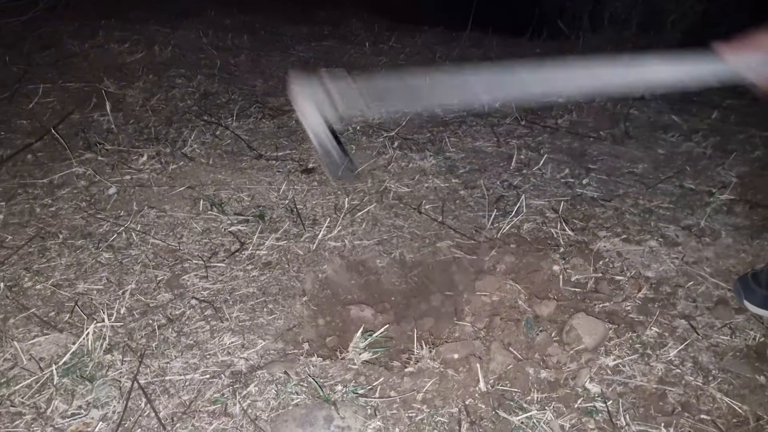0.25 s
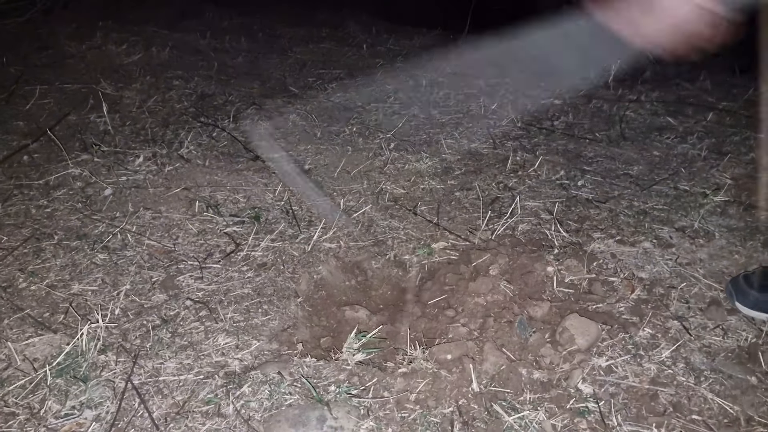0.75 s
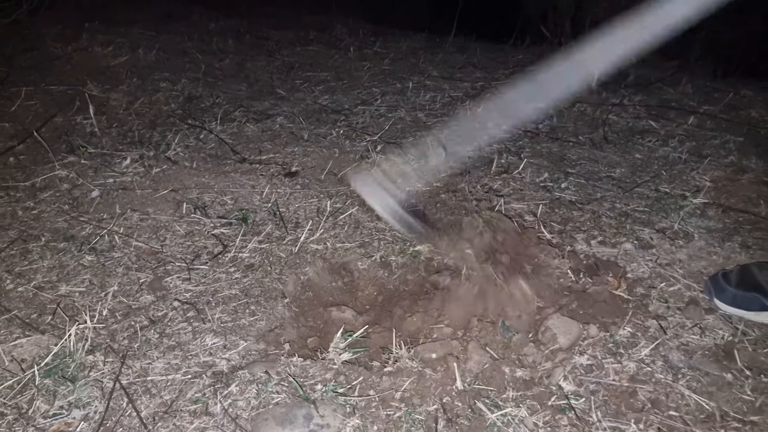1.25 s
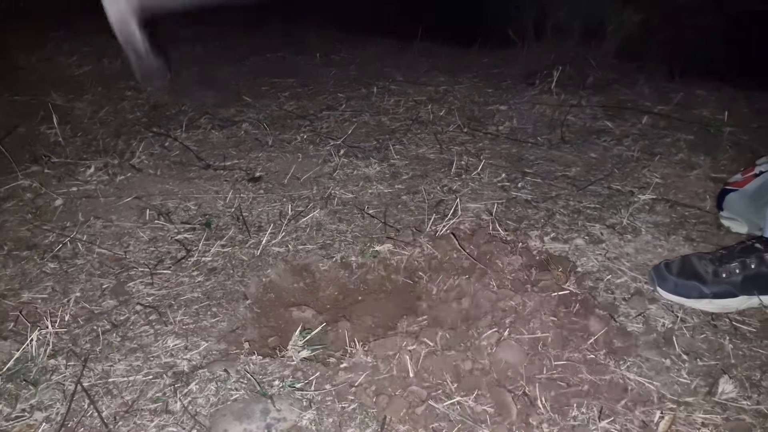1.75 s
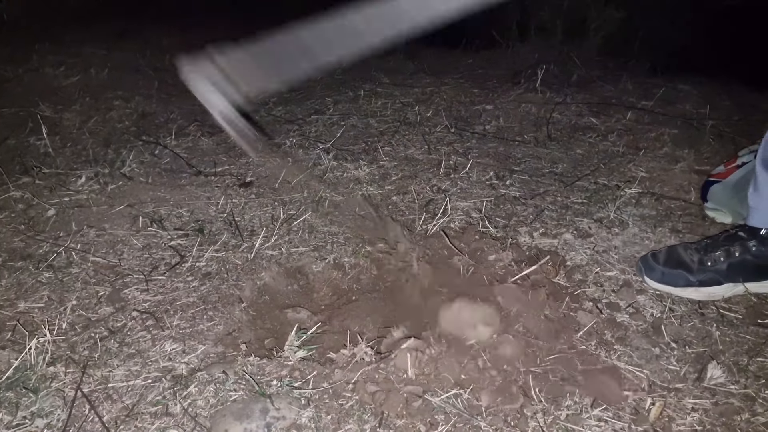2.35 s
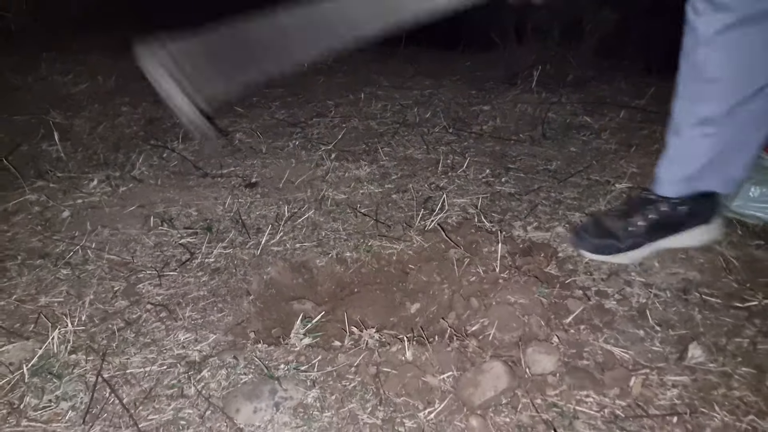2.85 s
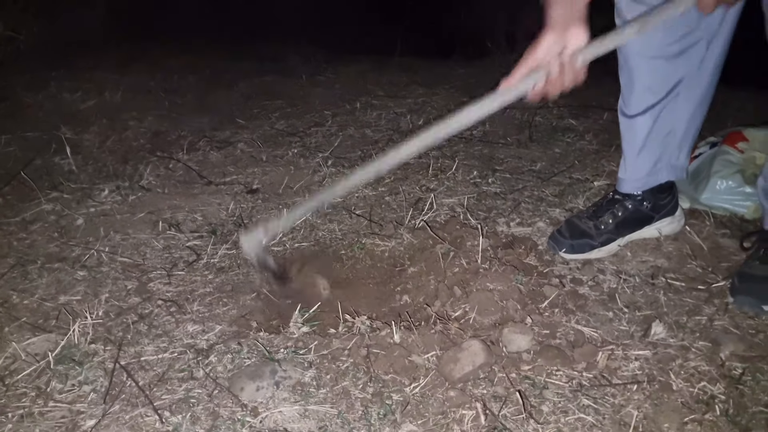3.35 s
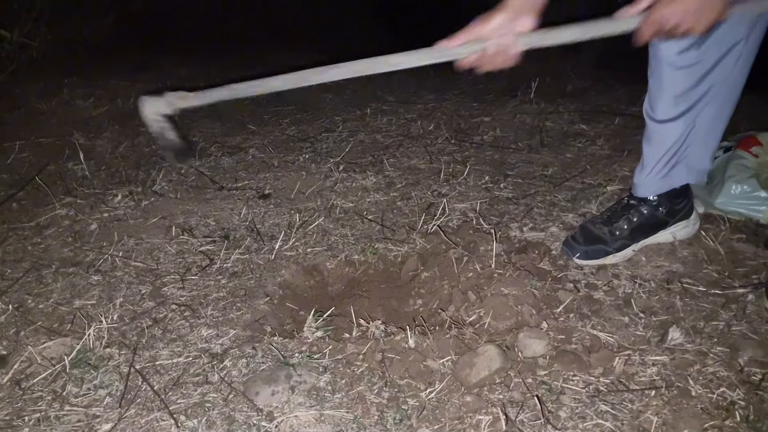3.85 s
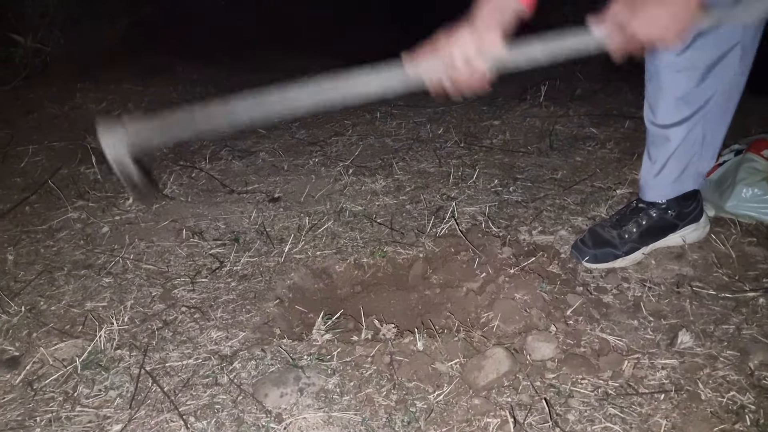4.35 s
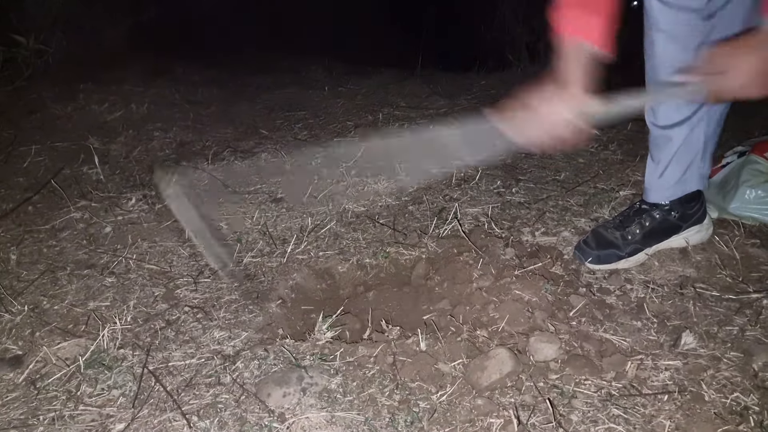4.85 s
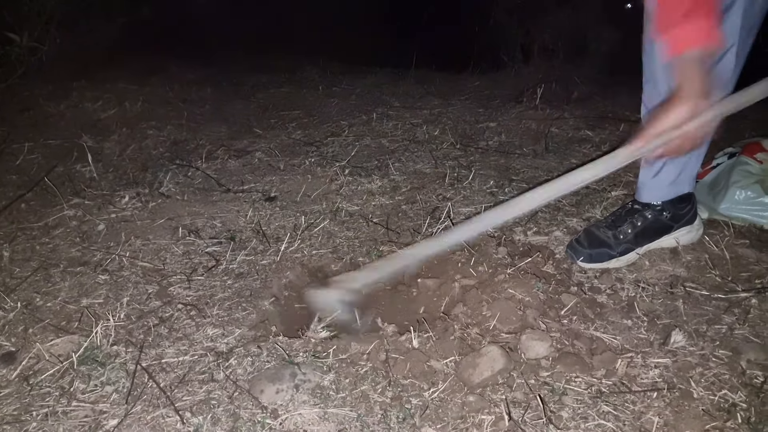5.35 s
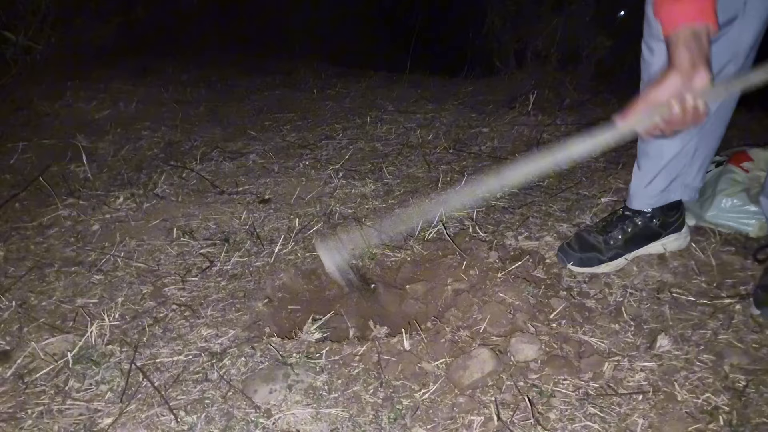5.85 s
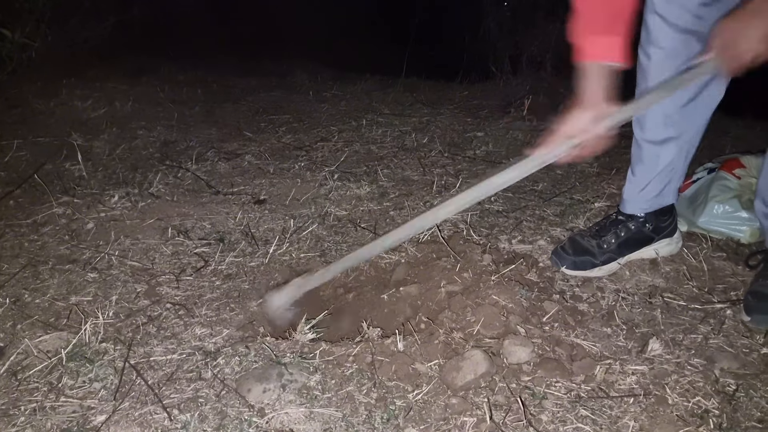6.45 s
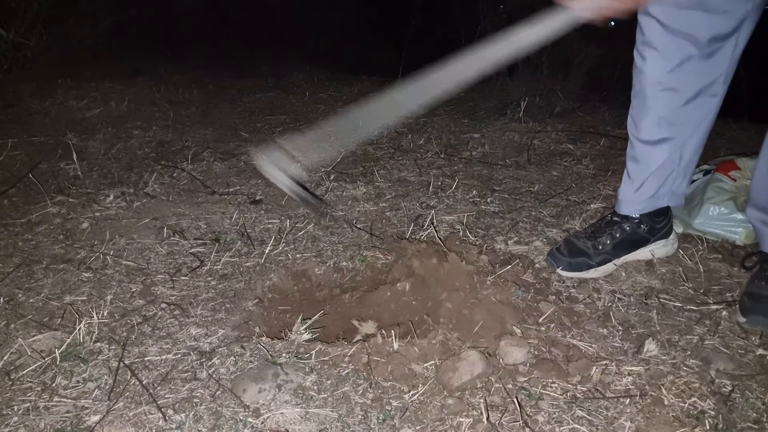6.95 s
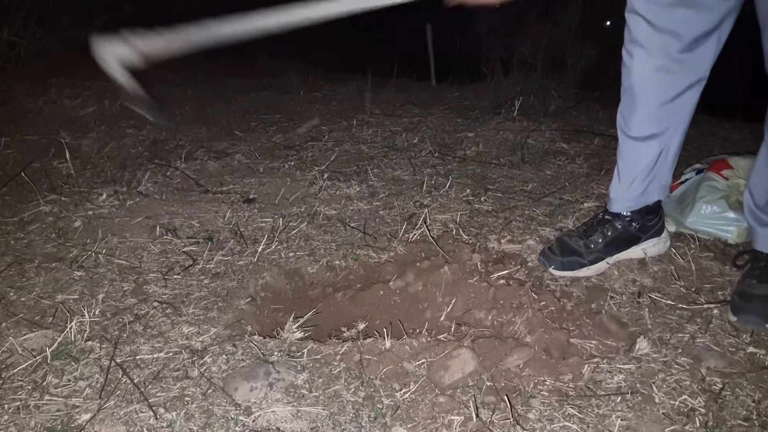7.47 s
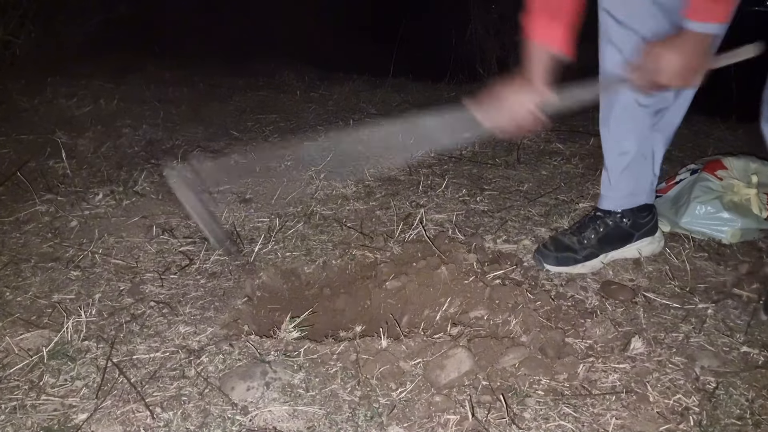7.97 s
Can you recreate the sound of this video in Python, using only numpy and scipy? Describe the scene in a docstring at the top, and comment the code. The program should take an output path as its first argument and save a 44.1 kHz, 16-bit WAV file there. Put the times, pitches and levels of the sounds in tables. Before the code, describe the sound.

Outdoors on open ground at night, close stereo pickup of rapid digging. Early strokes are bright and gritty, with dust hissing down; around three to four seconds the bites are lighter and more metallic, then become firmer, with sharp knocks and scraping pulls. Small shoe scuffs and loose soil fill the gaps. Low wind buffets come and go, with barely audible distant tones and a cricket.

```python
"""A steel hoe chops hard dry ground at night, nearly three strokes a second; light wind rumbles behind.
Each stroke is a swell of breaking grains exciting ground, hollow, blade and grit; drags and knocks follow.
Soil spills, shoes scuff and crumbs tick as filtered grain bursts; dust hisses as swelling noise.
Wind and night air are coloured noise; a far cricket and faint far tones are blurred into narrow bands."""
import sys
import numpy as np
from scipy import signal
from scipy.fft import rfft, irfft
from scipy.io import wavfile
from scipy.ndimage import uniform_filter1d

SR = 44100
rng = np.random.default_rng(int(sys.argv[2]) if len(sys.argv) > 2 else 0)


def log_audio(samples):
    """Write samples as a 16-bit WAV file to the path given in sys.argv[1]."""
    # one column per channel
    frames = np.atleast_2d(samples).T
    # limit to full scale, then quantise
    limited = np.clip(frames, -1, 1)
    pcm = np.round(limited * 32767).astype(np.int16)
    wavfile.write(sys.argv[1], SR, pcm)


N = 362061
SIZE = 16384  # samples per event
T = (np.arange(SIZE) - SIZE // 2) / SR  # time around one event [s]

# blade entering the soil: (peak time [s], packed earth [dB], hollow of the hole [dB], blade ring [dB],
# grit [dB], crumbling tail [dB], thrown dust [dB], left minus right [dB])
CHOPS = [(.139, -30, -50, -28.5, -25.5, -14, -75, -1), (.476, -39, -37.5, -30.5, -27, -8.5, -68.5, -1),
         (.818, -36, -37.5, -22, -27, -11.5, -64, -0.5), (1.175, -37.5, -34.5, -29.5, -23, -17, -69.5, 1),
         (1.518, -40, -61, -36, -32, -12.5, -59, -2), (1.871, -25, -43, -28, -26, -20.5, -82.5, 3.5),
         (2.219, -34, -29, -29, -25, -7.5, -62.5, -1.5), (2.588, -32, -56, -31, -29, -16, -64, -3),
         (2.955, -44, -61, -24.5, -51.5, -25.5, -72, -5.5), (3.344, -46, -39, -28.5, -41, -13.5, -72, -5.5),
         (3.676, -46, -43.5, -22, -25.5, -22, -87.5, 1), (4.013, -44, -38, -27.5, -26, -12, -66, -1),
         (4.481, -31.5, -30.5, -26, -28.5, -7, -79, -1.5), (4.926, -29, -30, -25.5, -26, -11, -70.5, -2.5),
         (5.361, -29, -30, -28.5, -28, -8.5, -85.5, 1.5), (5.773, -26, -27, -28.5, -38.5, -10, -94.5, -1.5),
         (6.134, -28.5, -22.5, -34, -24.5, -14.5, -95.5, -1.5),
         (6.499, -30, -33.5, -30.5, -28, -14, -92, 0), (6.824, -32, -25, -32.5, -26, -15, -76, 0),
         (7.201, -30.5, -33.5, -25.5, -25, -10.5, -66.5, -3.5), (7.648, -34, -36.5, -36, -25, -11, -75, -1),
         (8.032, -33.5, -44, -26, -28.5, -10, -74, -1.5)]


def undb(db):
    """Decibels to gain."""
    return 10 ** (np.asarray(db) / 20)


def unit(x):
    """Scale to rms 1."""
    return x / np.sqrt(np.mean(np.abs(x) ** 2) + 1e-30)


def freqs(size=SIZE):
    """Frequency axis of a spectrum [Hz], floored at 1 Hz."""
    return np.maximum(np.fft.rfftfreq(size, 1 / SR), 1)


def curve(rows, column=1):
    """One column of a time table, interpolated for every sample."""
    rows = np.array(rows)
    return np.interp(np.arange(N) / SR, rows[:, 0], rows[:, column])


def colour(points, size=SIZE):
    """Causal minimum-phase response through (frequency [Hz], level [dB]) points."""
    hz, db = np.transpose(points)
    level_db = np.interp(np.log(freqs(size)), np.log(hz), db)
    cepstrum = irfft(np.log(undb(level_db)), size)
    cepstrum[1:size // 2] *= 2
    cepstrum[size // 2 + 1:] = 0
    return np.exp(rfft(cepstrum))


def resonance(hz, width_hz, size=SIZE):
    """Response of one resonance, gain 1 at its centre."""
    f = freqs(size)
    return 1 / (1 + 1j * (f * f - hz * hz) / (f * width_hz))


def walk(step, size=N):
    """Smooth random wander that changes about every step points; spread near 1."""
    step = max(int(step), 2)
    held = np.repeat(rng.standard_normal(size // step + 1), step)
    return 1.34 * uniform_filter1d(uniform_filter1d(held, step), step)[:size]


def noise(response, likeness=0.):
    """Steady stereo noise of a given colour; likeness is the power share common to both sides."""
    left, right, common = rng.standard_normal((3, N))
    share = np.clip(likeness, 0, 1)
    stereo = np.sqrt(1 - share) * np.array([left, right]) + np.sqrt(share) * common
    return unit(irfft(rfft(stereo) * response, N))


def grains(spread_db):
    """Dense tiny fractures: mostly small, a few large."""
    size_db = spread_db * np.minimum(rng.exponential(size=SIZE), 6)
    return unit(rng.standard_normal(SIZE) * undb(size_db))


def bell(sigma_s):
    """Smooth Gaussian swell and fall around the event's time."""
    return np.exp(-.5 * (T / sigma_s) ** 2)


def fall(decay_s):
    """Sudden start and exponential fall."""
    return (T >= 0) * np.exp(-np.abs(T) / decay_s)


def ring(force, response, envelope):
    """Spectrum of a force heard through a body, scaled by the energy of the envelope."""
    return unit(rfft(force) * response) * np.sqrt(np.sum(envelope ** 2))


def add(out, s, spectrum, pan_db, scatter_rad=1.106, ripple_db=3.5, apart_hz=750):
    """Place an event; above the bass, rough ground scatters it differently to the two microphones."""
    apart = np.minimum(freqs() / apart_hz, 1)
    turn, tilt = (walk(170, size=len(apart)) for _ in range(2))
    side = np.array([[1], [-1]])
    gain = undb(side * (pan_db / 2 + ripple_db * tilt) * apart)
    gain = gain / np.sqrt(np.mean(gain ** 2, axis=0))
    phase = np.exp(1j * side * scatter_rad * turn * apart)
    sound = irfft(spectrum * gain * phase)
    start = int(s * SR) - SIZE // 2
    lo, hi = max(start, 0), min(start + SIZE, N)
    out[:, lo:hi] += sound[:, lo - start:hi - start]


def wind(trim_db=-1, buffet_db=2.5, bump_trim_db=-1):
    """Light gusts rumble at the microphone as low noise, with dull bumps from low resonances."""
    # breeze: (time [s], rumble level [dB])
    breeze = [(0, -56.5), (.33, -51), (.65, -61.5), (1.1, -43), (1.33, -58), (1.8, -62.5), (2.7, -66.5),
              (2.92, -48), (3.12, -63.5), (3.6, -62), (4.1, -46.5), (4.26, -59.5), (4.36, -39.5),
              (4.9, -45), (5.25, -54.5), (5.95, -66), (6.45, -57.5), (6.7, -61), (8.2, -71.5)]
    # rumble spectrum: (frequency [Hz], level [dB])
    rumble = [(20, -7.5), (55, 0.5), (100, 0), (160, -0.5), (210, -15.5), (300, -23), (480, -45.5),
              (1200, -66.5)]
    # dull low bumps: (time [s], level [dB], pitch [Hz])
    bumps = [(.425, -50, 140), (.661, -54.5, 158), (.882, -46, 150), (1.004, -43.5, 140),
             (1.218, -38.5, 120), (4.352, -39.5, 155), (4.572, -41.5, 130), (5.165, -46.5, 120),
             (5.435, -34.5, 129.5)]
    level_db = curve(breeze) + trim_db + buffet_db * walk(SR / 30)
    out = noise(colour(rumble, size=N), likeness=0.37) * undb(level_db)
    swell = bell(sigma_s=.009)
    for s, db, hz in bumps:
        body = resonance(hz, 94) ** 2
        add(out, s, undb(db + bump_trim_db) * ring(swell * grains(spread_db=1), body, swell), pan_db=0)
    return out


def far_tone(hz, db, blur_hz):
    """Many paths through the night air smear a distant tone into a narrow band."""
    paths = np.array([walk(SR / blur_hz) + 1j * walk(SR / blur_hz) for _ in range(2)])
    return undb(db) * np.real(paths * np.exp(2j * np.pi * np.cumsum(hz) / SR))


def still_air(level_db=-70):
    """Night air: coloured noise that wanders slowly in level."""
    # night spectrum: (frequency [Hz], level [dB])
    night_colour = [(30, 10.5), (150, 8.5), (300, 4.5), (550, 2.5), (850, -7), (1300, -5.5), (2700, -11),
                    (5000, -13.5), (7500, -21), (10000, -19), (16000, -19.5)]
    return noise(colour(night_colour, size=N), likeness=0.24) * undb(level_db + 1.0 * walk(SR / 3))


def cricket(centre_hz=2030, level_db=-79):
    """Far cricket: one continuous blurred tone, wandering in pitch and level."""
    return far_tone(centre_hz + 12 * walk(SR / 6), level_db + 1.5 * walk(SR / 5), blur_hz=137)


def far_calls(pitch_hz=562, trim_db=-1):
    """Faint far calls: Gaussian swells of one blurred note."""
    # (peak time [s], Gaussian sigma [s], level [dB])
    calls = [(5.31, 0.036, -68), (5.6, .09, -76.5), (6.27, 0.042, -68), (6.43, 0.03, -66),
             (6.64, 0.047, -66), (7.46, 0.019, -61.5)]
    t = np.arange(N) / SR
    swells = sum(undb(db) * np.exp(-.5 * ((t - s) / sigma_s) ** 2) for s, sigma_s, db in calls)
    return swells * far_tone(np.full(N, pitch_hz), trim_db, blur_hz=72.7)


def falling_tone(trim_db=-1):
    """Higher far tone: a blurred tone gliding down in pitch."""
    # (time [s], pitch [Hz], level [dB])
    glide = [(5.85, 1400, -100), (5.95, 1380, -74), (6.08, 1360, -78), (6.28, 1293, -81.5),
             (6.42, 1265, -79.5), (6.5, 1260, -100)]
    return far_tone(curve(glide), curve(glide, column=2) + trim_db, blur_hz=73.5)


def bodies(detune=0.014, thud_hz=155, hollow_hz=1750):
    """Ground, hollow and blade; the soil loads the blade a little differently on every contact."""
    # steel blade modes, damped by the soil: (frequency [Hz], width [Hz], level [dB])
    modes = [(2330, 99, -13), (4470, 170, -8), (4857, 200, 6.5), (5180, 200, -5), (6040, 170, -15.5),
             (7430, 150, -6.5), (9900, 220, -18.5), (13015, 300, -18.5), (15200, 200, -21.5)]
    shifts, loads = rng.standard_normal((2, len(modes)))
    loads_db = 3.2 * np.clip(loads, -1.5, 1.5)
    blade = sum(undb(db + load_db) * resonance(hz * (1 + detune * shift), width_hz)
                for (hz, width_hz, db), shift, load_db in zip(modes, shifts, loads_db))
    return resonance(thud_hz, 260) ** 2, resonance(hollow_hz, 690) ** 2, blade


def contact(forces, envelope, levels_db):
    """One contact of the blade: forces excite crunch, thud, hollow, blade ring and grit."""
    # packed earth spectrum: (frequency [Hz], level [dB])
    crunch_colour = [(80, -23), (300, -3), (1000, 0), (3000, -7), (6000, -16), (16000, -36.5)]
    # grit spectrum: (frequency [Hz], level [dB])
    grit_colour = [(600, -29), (1800, -9.5), (2800, 1.5), (5800, 0), (6900, -3.5), (8000, 1), (11500, -9.5),
                   (15500, -13)]
    responses = (colour(crunch_colour), *bodies(), colour(grit_colour))
    return sum(undb(db) * ring(force, body, envelope)
               for force, db, body in zip(forces, levels_db, responses))


def chops(bite_sigma_s=.0095, crumble_s=0.021, after_db=-38, after_s=0.036, ring_s=.025):
    """Blade entering the soil: a swell of breaking grains with an uneven crumbling tail."""
    # thud at usual firmness, weaker once the microphone draws back from the hole: (time [s], level [dB])
    near_thud = [(0, -32), (1.85, -31), (2.3, -39.5), (8.2, -39)]
    firm_db, thud_slope = -32, 0.48  # usual firmness; dB of thud per dB of firmness
    out = np.zeros((2, N))
    swell = bell(bite_sigma_s)
    for s, earth_db, hollow_db, blade_db, grit_db, crumble_db, _, pan_db in CHOPS:
        # firm earth both crunches and thuds
        thud_db = np.interp(s, *np.transpose(near_thud)) + thud_slope * (earth_db - firm_db)
        levels_db = (earth_db, thud_db, hollow_db, blade_db, grit_db)
        # the earth keeps crumbling unevenly after the blade has stopped
        tail = undb(crumble_db) * fall(crumble_s) + undb(after_db) * fall(after_s)
        tail = tail * undb(4.2 * walk(160, size=SIZE))
        bite = np.hypot(swell * undb(1.2 * walk(70, size=SIZE)), tail)
        # soil damps the buried blade, so its drive dies away after the cut
        cut = bite * np.exp(-np.maximum(T - bite_sigma_s, 0) / ring_s)
        forces = [drive * grains(spread_db=2.5) for drive in (bite, bite, bite, cut, bite)]
        add(out, s, contact(forces, swell, levels_db), pan_db)
    return out


def knocks():
    """Blade meeting a stone or hard clod: one sharp push and a short crack."""
    # (time [s], crunch [dB], thud [dB], hollow [dB], blade ring [dB], grit [dB], left minus right [dB])
    hits = [(.1608, -29.5, -36.5, -17, -7, -22, -1.5), (.488, -30, -37, -32, -49, -33, -1),
            (1.879, -30, -33.5, -51, -31.5, -19.5, 1), (2.2356, -58, -44, -19, -26.5, -19, -4),
            (2.5914, -12, -18, -47, -24.5, -36.5, -12), (2.6348, -36.5, -45.5, -35, -31, -29.5, -2),
            (2.959, -40, -53, -63, -22.5, -53, 1), (3.341, -44, -42, -43, -20, -27.5, -1),
            (3.686, -28, -37, -36.5, -54, -32, -15.5), (4.0214, -37, -38.5, -38, -41.5, -23, 2),
            (4.0594, -22, -27.5, -41, -54.5, -17.5, -6), (4.07, -20, -28, -22.5, -48, -24, 7.5),
            (4.0771, -16.5, -38, -50, -26, -44, -8), (4.511, -39, -42, -10, -14.5, -33, -5),
            (4.592, -32, -35, -69, -57, -59, 0), (4.9633, -23, -29, -21, -31, -28.5, -4),
            (4.9839, -13.5, -24, -27, -18, -32.5, -5), (5.387, -18.5, -19.5, -39, -45, -43.5, 5),
            (6.174, -22, -26, -38, -50, -26.5, -1), (6.5423, -29.5, -33.5, -57, -66, -37.5, -5),
            (6.9506, -58, -52, -45.5, -41, -31, -1), (7.2048, -19.5, -22, -21.5, -24, -19.5, -3),
            (7.249, -42, -55.5, -44, -37, -36, -1), (8.0332, -11, -34, -38, -22, -10, 4.5)]
    out = np.zeros((2, N))
    crack = fall(decay_s=0.0015) + undb(-23.0) * fall(decay_s=.008)
    push = 4.0 * fall(decay_s=.00004)
    for s, *levels_db, pan_db in hits:
        forces = [crack * grains(spread_db=1.0) + push for _ in levels_db]
        add(out, s, contact(forces, crack, levels_db), pan_db, scatter_rad=.7)
    return out


def drags(trim_db=-1.5):
    """Blade dragging on: it sticks and slips as it is pulled, an uneven swell of grains."""
    # (peak time [s], Gaussian sigma [s], packed earth [dB], scraping steel [dB], left minus right [dB])
    pulls = [(.525, 0.0087, -41.5, -33.5, -5), (0.946, .013, -73, -39.5, -2),
             (1.893, 0.011, -46, -37, -10.5), (2.24, 0.0031, -43, -46, 2.5), (2.606, 0.0093, -48.5, -43, 3),
             (2.639, 0.0068, -48, -47, -1.5), (3.362, 0.009, -57, -41.5, -2), (4.069, .01, -28.5, -37, 4.5),
             (4.536, .011, -36, -44, -1.5), (4.583, 0.014, -54.5, -58, -11),
             (4.971, 0.0076, -31, -27.5, -4.5), (4.994, .011, -34, -33.5, 1),
             (5.398, 0.0058, -39, -32.5, -11), (5.42, 0.014, -35, -40, -1.5),
             (5.462, 0.0048, -54, -48.5, -5), (5.8, 0.0036, -39, -36, -6), (5.821, .0079, -36, -38, -1.5),
             (6.182, 0.0089, -42.5, -40, -7), (6.205, .011, -51, -45.5, -6),
             (6.852, 0.0034, -42.5, -41.5, 2.5), (6.872, 0.009, -45, -36, -1),
             (7.226, 0.0095, -44.5, -34.5, -5), (7.257, 0.004, -39, -42, -0.5),
             (7.678, 0.012, -50, -36.5, -4), (8.06, 0.0099, -51.5, -42, -3),
             (8.086, 0.0086, -48, -38.5, -5)]
    thud_db, hollow_db, grit_db = -5, -2.5, -0.5  # thud and hollow re earth, grit re steel
    out = np.zeros((2, N))
    for s, sigma_s, earth_db, steel_db, pan_db in pulls:
        levels_db = (earth_db, earth_db + thud_db, earth_db + hollow_db, steel_db, steel_db + grit_db)
        swell = bell(sigma_s)
        drag = swell * undb(3.0 * walk(90, size=SIZE))
        forces = [drag * grains(spread_db=2.5) for _ in levels_db]
        add(out, s, undb(trim_db) * contact(forces, swell, levels_db), pan_db)
    return out


def crumbs(pan_db=-3.5, stray_max_db=-57, stray_count=45):
    """Crumbs land and straws snap: short resonant ticks, plus fainter ones at random times."""
    # (time [s], level [dB], centre [Hz])
    placed = [(.252, -54, 12000), (.42, -55, 7000), (.973, -39.5, 7000), (1.069, -52, 4300),
              (1.3589, -44, 5950), (1.5295, -38.5, 2300), (2.7468, -40.5, 6700), (2.925, -44, 800),
              (3.0845, -49, 1700), (3.118, -45, 1880), (3.165, -52, 4000), (4.1486, -44.5, 4200),
              (4.169, -42, 4600), (4.577, -45.5, 5000), (5.215, -52, 5030), (5.2755, -54, 5010),
              (6.2628, -50, 2920), (6.591, -50.5, 2104), (7.2949, -42.5, 893), (7.3463, -45, 9200),
              (7.8023, -45, 10000), (7.9649, -49, 6700)]
    out = np.zeros((2, N))
    tick = fall(decay_s=0.0017) + undb(-16.0) * fall(decay_s=.006)
    strays = [(N / SR * when, stray_max_db + 8 * (big - 1), 2500 + 6000 * pitch)
              for when, big, pitch in rng.random((stray_count, 3))]
    for s, db, hz in list(placed) + strays:
        force = tick * grains(spread_db=5.0)
        add(out, s, undb(db) * ring(force, resonance(hz, 0.75 * hz), tick), pan_db)
    return out


def dust(flight_s=0.17, rise_s=0.052, settle_s=.095):
    """Each chop throws up dust that lands a moment later as fine hiss and thins out."""
    # dust spectrum: (frequency [Hz], level [dB])
    dust_colour = [(500, -7), (1400, 0.5), (2800, -2.5), (4700, 3), (7500, -0.5), (10000, -1),
                   (15500, -2.5)]
    t, power = np.arange(N) / SR, 0
    for s, *_, dust_db, _ in CHOPS:
        late_s = t - s - flight_s
        width_s = np.where(late_s < 0, rise_s, settle_s)
        power = power + undb(dust_db) ** 2 * np.exp(-(late_s / width_s) ** 2)
    hiss = noise(colour(dust_colour, size=N), likeness=.1)
    return hiss * np.sqrt(power) * undb(1.2 * walk(SR / 40)) * undb([[-2.5], [.5]])  # left, right


def spills(trim_db=-1, pan_db=-4.5):
    """Loose soil slides back and off the blade: uneven grain swells in a broad band, faint blade ring."""
    # (peak time [s], Gaussian sigma [s], level [dB], centre [Hz], blade ring [dB])
    slides = [(0.657, 0.012, -61, 9170, -68.5), (1.555, 0.027, -54.5, 4470, -69),
              (1.702, 0.017, -51.5, 8100, -62), (2.259, 0.017, -45.5, 2260, -63),
              (2.996, 0.02, -54.5, 2080, -70), (3.183, .017, -55.5, 2780, -71.5),
              (3.713, .013, -53.5, 2940, -54), (4.165, 0.0075, -58, 3000, -55), (4.29, .03, -67, 2400, -78),
              (4.637, 0.018, -56.5, 2780, -71), (5.058, 0.021, -54.5, 2410, -57),
              (5.844, 0.015, -50, 3440, -56), (6.941, .0066, -58, 3980, -62),
              (7.081, 0.017, -58.5, 9100, -76), (7.366, .012, -43.5, 4950, -65),
              (7.441, 0.0094, -58, 3500, -65), (7.732, 0.017, -56, 2770, -76),
              (7.973, 0.032, -61.5, 6000, -75)]
    out = np.zeros((2, N))
    for s, sigma_s, db, hz, blade_db in slides:
        slide = bell(sigma_s)
        force = slide * grains(spread_db=3.5) * undb(1.7 * walk(130, size=SIZE))
        soil = undb(db) * ring(force, resonance(hz, 1.77 * hz) ** 2, slide)
        blade = undb(blade_db) * ring(force, bodies()[-1], slide)
        add(out, s, undb(trim_db) * (soil + blade), pan_db)
    return out


def scuffs(pan_db=-3):
    """Shoe soles shift on the dirt: uneven swells of ground grains through one resonance."""
    # (peak time [s], Gaussian sigma [s], level [dB], centre [Hz])
    shifts = [(2.78, 0.028, -54.5, 684), (2.887, .016, -60.5, 1700), (2.925, 0.013, -51.5, 800),
              (3.127, 0.012, -51, 1700), (3.139, 0.031, -63, 497), (3.489, 0.027, -58, 1320),
              (5.155, 0.011, -63.5, 685), (7.954, 0.026, -61.5, 600), (7.999, 0.012, -53.5, 910),
              (8.192, 0.035, -52.5, 770)]
    out = np.zeros((2, N))
    for s, sigma_s, db, hz in shifts:
        press = bell(sigma_s)
        force = press * grains(spread_db=3.0) * undb(3.1 * walk(120, size=SIZE))
        add(out, s, undb(db) * ring(force, resonance(hz, 0.74 * hz), press), pan_db)
    return out


def scene():
    """The digging in front of the quiet night."""
    night = still_air() + cricket() + far_calls() + falling_tone()
    hoe = chops() + knocks() + drags()
    loose_soil = crumbs() + dust() + spills() + scuffs()
    return wind() + night + hoe + loose_soil


def record(dry, ceiling=.62, top_hz=15900):
    """The microphone colours the treble, the sharpest cracks are rounded off, and the very top is cut."""
    # microphone port colour: (frequency [Hz], level [dB])
    port_colour = [(5000, -0.5), (7500, -2.5), (8700, -3.5), (10800, -4.5), (12800, 2), (15500, 5.5)]
    sound = irfft(rfft(dry) * colour(port_colour, size=N), N)
    sound = sound / (1 + (sound / ceiling) ** 4) ** (1 / 4)
    return signal.sosfilt(signal.ellip(10, .2, 70, top_hz, fs=SR, output="sos"), sound)


dry = scene()
out = record(dry)
log_audio(out)
```